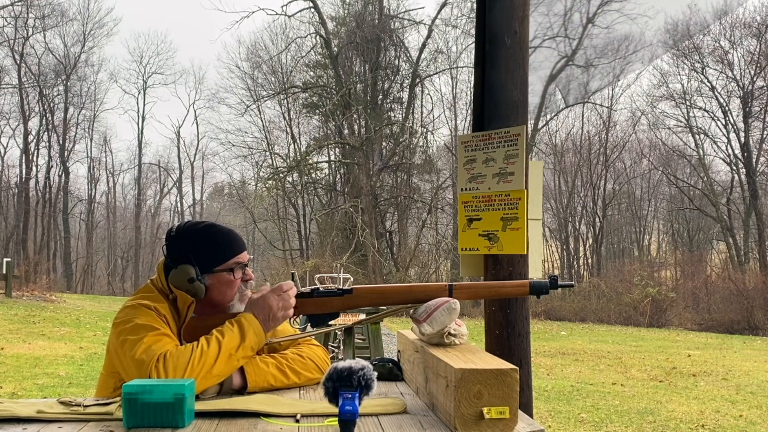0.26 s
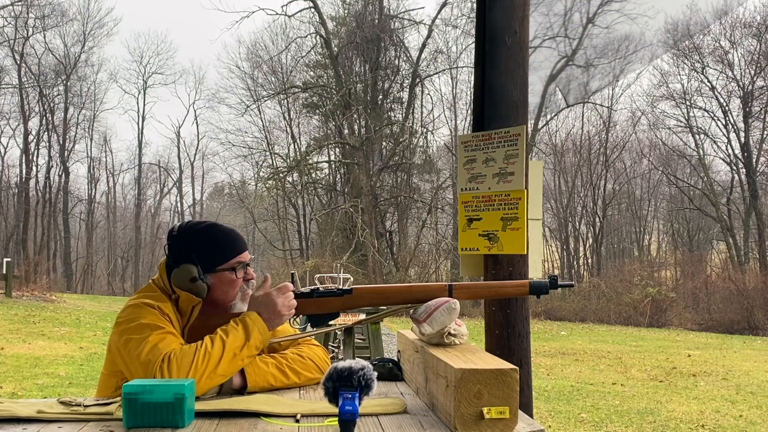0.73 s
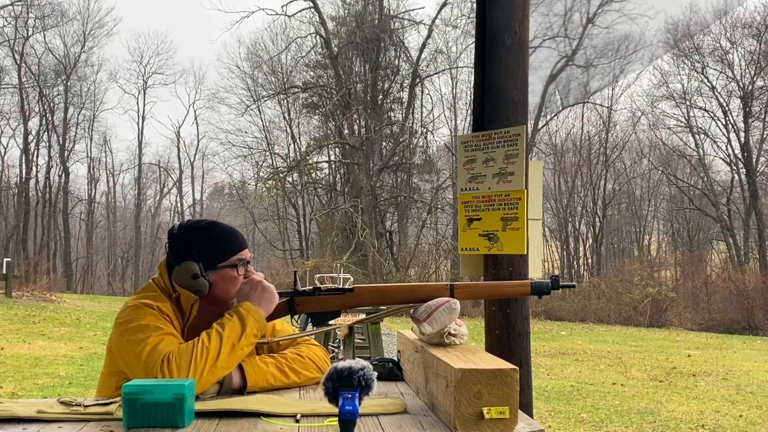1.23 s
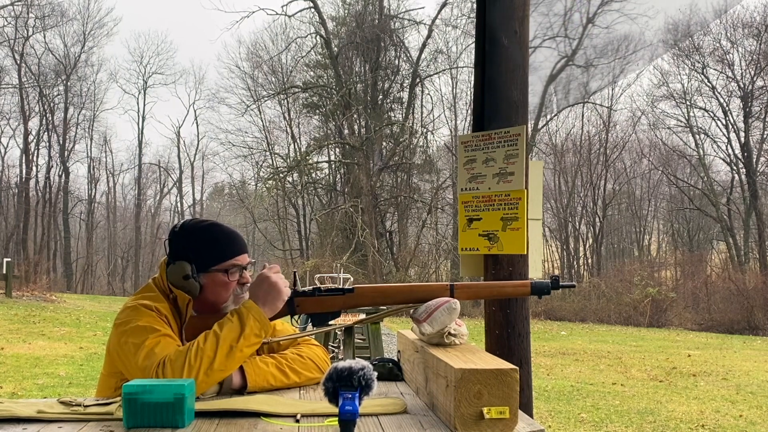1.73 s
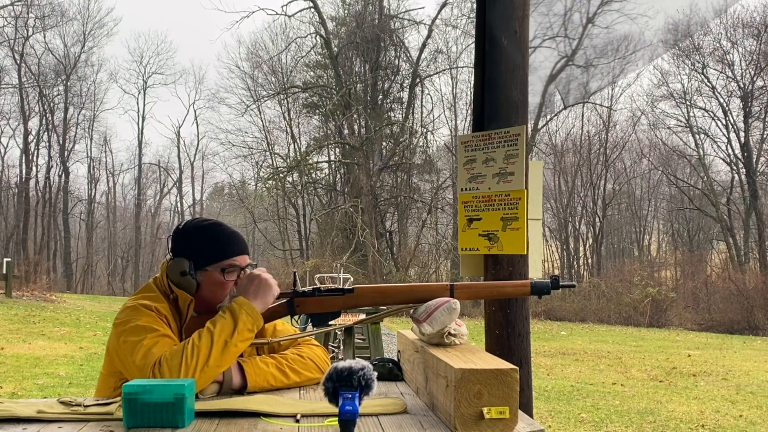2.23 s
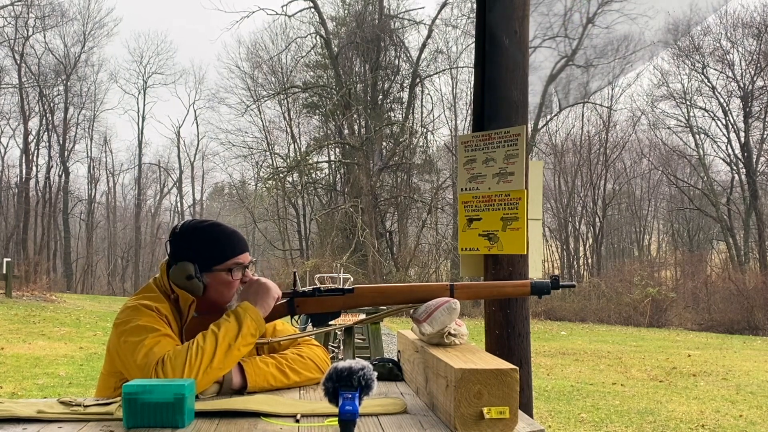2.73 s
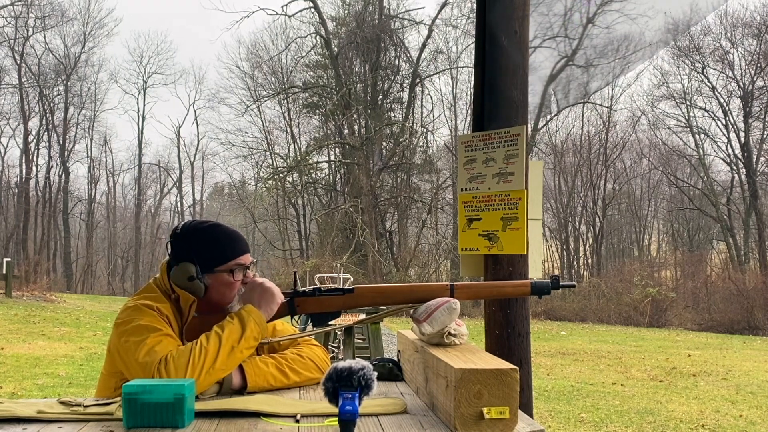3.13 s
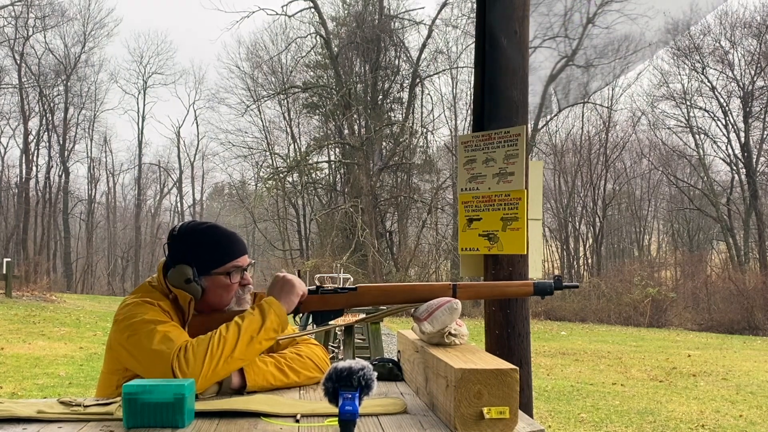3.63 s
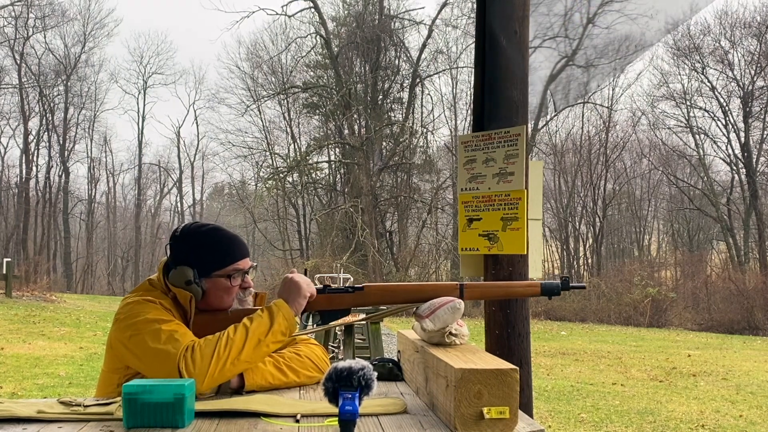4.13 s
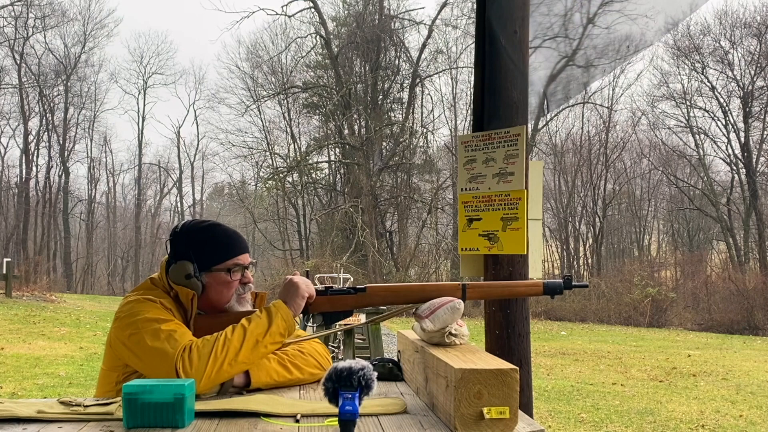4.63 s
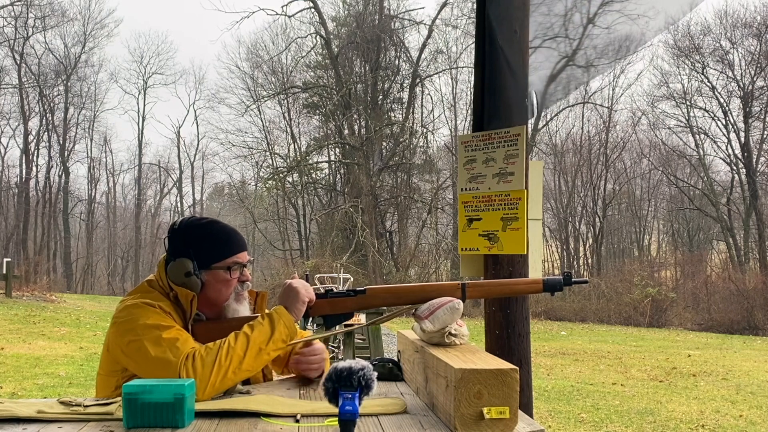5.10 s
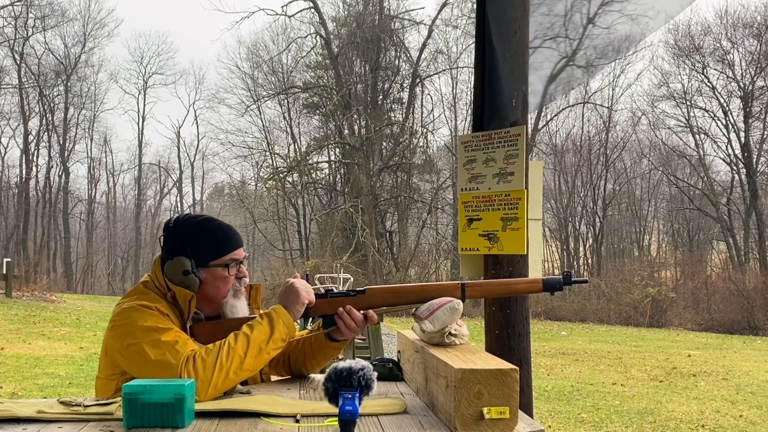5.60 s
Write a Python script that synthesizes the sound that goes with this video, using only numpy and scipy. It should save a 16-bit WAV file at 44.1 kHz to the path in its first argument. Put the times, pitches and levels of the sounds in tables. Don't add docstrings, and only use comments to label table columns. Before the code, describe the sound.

Sharp steel bolt clatter and a hollow knock of a spent case on a bench, then quiet rain, reloading clacks and sleeve rustle.

```python
import sys
import numpy as np
from scipy import signal
from scipy.fft import rfft, irfft, next_fast_len
from scipy.io import wavfile
from scipy.ndimage import uniform_filter1d, map_coordinates

SR = 44100
rng = np.random.default_rng(int(sys.argv[2]) if len(sys.argv) > 2 else 0)


def unload_audio(sound):
    columns = np.transpose(np.atleast_2d(sound))
    steps = np.round(np.clip(columns, -1, 1) * 32767)
    wavfile.write(sys.argv[1], SR, steps.astype(np.int16))


def boost(x):
    u = np.asarray(x, float) / 20
    return 10 ** u


N = 258426

# start_s, peak_db, board_boom_db, treble_db, hollow_knock_db
BOUNCES = [
    (1.3230, -16, -10.5, -45, -8),
    (1.335, -43, -8, -28.5, -12),
    (1.3456, 9, -15.5, -33, -12.5),
    (1.426, -23, -6, -36, -7),
    (1.452, -22, -22, -40, -9),
    (1.4685, 1, -12, -29, -16),
    (1.501, -7.5, -23, -35, -14),
]
# centre_hz, width_hz, level_db
STOCK_CLOSED = [(633, 65, 3), (970, 305, -5.5), (1500, 600, -10.5)]


def unit(x):
    return x / np.sqrt(np.mean(x ** 2) + 1e-20)


def along(points, hz):
    f, v = np.transpose(points)
    return np.interp(np.log(hz + 1), np.log(f + 1), v)


def curves(rows, outside=None):
    s, *cols = np.transpose(rows)
    return [np.interp(np.arange(N) / SR, s, c, outside, outside) for c in cols]


def wobble(rate):
    knots = rng.standard_normal(int(N * rate / SR) + 4)
    return map_coordinates(knots, [np.arange(N) * rate / SR]).clip(-2.3, 2.3)


def filtered(x, response):
    m = next_fast_len(x.shape[-1] + 4096)
    return irfft(rfft(x, m) * response(np.fft.rfftfreq(m, 1 / SR)), m)[..., :x.shape[-1]]


def resonances(peaks):
    def response(f):
        return sum((-1) ** k * boost(db) * 1j * f * width / (centre * centre - f * f + 1j * f * width)
                   for k, (centre, width, db) in enumerate(peaks))
    return response


def add(track, s, sound):
    part = track[..., round(s * SR):][..., :sound.shape[-1]]
    part += sound[..., :part.shape[-1]]


def ring(hz, t60, t, attack, lead=0):
    decay = boost(-60 * t / t60)
    return np.sin(2 * np.pi * hz * t + lead) * decay * (1 - np.exp(-t / attack))


def wide_ring(modes, t, attack):
    side = np.array([[.5], [-.5]])
    return sum((-1) ** k * boost(db + side * pan_db) * ring(hz, t60, t, attack, side * lead)
               for k, (hz, db, t60, pan_db, lead) in enumerate(modes))


def rush(spectrum, alike, patchy_db, pan_db, grit_db=0):
    rough = rng.standard_normal((2, N)) * boost(grit_db * wobble(400))
    z = signal.stft(rough, nperseg=512)[2]
    field = uniform_filter1d(rng.standard_normal(z.shape[1:]), size=6, axis=0)
    field = uniform_filter1d(field, size=10, axis=1)
    patches = boost(patchy_db * unit(field).clip(-2, 2))
    pair = signal.istft(z * patches, nperseg=512)[1][:, :N]
    turn = np.arccos(np.clip(alike, -1, 1)) / 2
    coloured = filtered(pair, lambda hz: boost(along(spectrum, hz)))
    mid, side = coloured * [[np.cos(turn)], [np.sin(turn)]]
    return unit(np.array([mid + side, mid - side])) * boost([[pan_db / 2], [-pan_db / 2]])


def rain():
    # pitch_hz, density_db
    far_spectrum = [(120, -45.5), (200, -3), (300, -6.5), (1000, -10), (2500, -15), (5000, -21),
                    (9000, -25), (14000, -50)]
    # pitch_hz, density_db
    fine_spectrum = [(1800, -24.5), (3500, -8.5), (6500, -19), (9000, -14), (12000, -13.5), (14000, -15),
                     (16000, -17.5)]
    far = rush(far_spectrum, alike=0.44, patchy_db=0.5, pan_db=2.0)
    fine = rush(fine_spectrum, alike=0.2, patchy_db=2.0, pan_db=2.0, grit_db=2.5)
    far_db = -53 + 5.5 + 0.18 * wobble(4.5)
    fine_db = -60.5 + 3.0 + 1.0 * wobble(27)
    return boost(far_db) * far + boost(fine_db) * fine


def wind():
    # start_s, level_db
    gusts = [(0.0, -52), (0.44, -36.5), (0.73, -50), (1.16, -41.5), (1.45, -61), (1.71, -44), (1.85, -51),
             (3.44, -52), (4.54, -55.5), (5.3, -49.5), (5.86, -49.5)]
    # pitch_hz, density_db
    buffet_spectrum = [(8.8, -39.5), (15, -0.5), (43, 4), (80, -0.5), (119, -5), (200, -21.5), (260, -37),
                       (440, -120)]
    gust_db, = curves(gusts)
    lumps = boost(1.6 * np.array([wobble(4), wobble(4)]))
    buffet = rush(buffet_spectrum, alike=-0.14, patchy_db=3.0, pan_db=4.5)
    return boost(gust_db + 4.5) * unit(lumps * buffet)


def drips():
    # start_s, peak_db
    heavy = [(0.2933, -32), (0.338, -38), (0.4677, -37), (0.5205, -33.5), (0.681, -34.5), (1.2003, -36),
             (1.64, -35.5), (1.7784, -33.5), (2.256, -36.5), (2.342, -35.5), (2.462, -31.5), (2.474, -34),
             (2.714, -34), (2.736, -34.5), (2.821, -31.5), (2.9, -37), (2.9225, -37.5), (3.007, -32),
             (3.391, -32), (3.9063, -36.5), (4.2088, -36), (4.3030, -36), (4.346, -40), (4.461, -31),
             (5.6186, -35), (5.6525, -37), (5.745, -35), (5.783, -35.5), (5.825, -37)]
    light = [0.0084, 0.0558, 0.0987, 0.6155, 0.6594, 1.3032, 1.8327, 1.9046, 1.9594, 1.9959, 2.424, 2.521,
             2.537, 2.5784, 2.6896, 2.77, 3.1394, 3.1995, 3.2516, 3.8055, 4.022, 4.037, 4.186, 4.2434,
             4.259, 4.4187, 5.573, 5.709]
    # pitch_hz, density_db
    splash_spectrum = [(1500, -28), (3500, -2), (6000, -3), (10000, -1.5), (14000, -10), (17000, -7.5)]
    light_db, drop_hz, spread = -41, 6950, 0.15
    out, t = np.zeros((2, N)), np.arange(SR // 12) / SR
    for s, db in heavy + [(s, light_db) for s in light]:
        noise = rng.standard_normal((4, len(t)))
        u = t / (.012 * boost(2.5 * noise[0, 0]))
        hz = drop_hz * np.exp(spread * noise[1, 0])
        grains = boost(4.8 * unit(uniform_filter1d(noise[3], size=40))) * u * np.exp(1 - u * u)
        colour = resonances([(hz, 900, 0)])
        spray = filtered((noise[0] + 1.6 * noise[1:3]) * grains,
                         lambda f: boost(along(splash_spectrum, f)) + boost(2.0) * colour(f))
        add(out, s - .004, boost(db + 3.5) * spray / abs(spray).max())
    return out * boost([[3], [-3]])


def effort():
    # start_s, level_db
    strokes = [
        [(.08, -68.5), (.16, -49.5), (.24, -49.5), (.36, -53)],
        [(4.5, -58.5), (4.58, -46), (4.66, -43), (4.74, -46.5), (4.94, -45), (5.04, -44.5), (5.09, -49)],
        [(5.09, -47), (5.11, -46), (5.2, -47.5), (5.33, -45), (5.38, -43), (5.43, -40.5), (5.49, -42.5),
         (5.53, -46.5), (5.62, -69.5)],
    ]
    return np.max([curves(rows, -120)[0] for rows in strokes], axis=0)


def sleeve():
    # pitch_hz, density_db
    hiss_spectrum = [(1500, -1.5), (2400, 0.5), (4050, -1.5), (5220, 3), (6760, 1), (10300, 0), (14500, -9),
                     (16000, -15.5)]
    # pitch_hz, density_db
    scrape_spectrum = [(150, -11), (250, -13), (620, -3.5), (1500, -6), (2500, -5), (4200, -12),
                       (6800, -21), (11000, -22.5)]
    even_db, growth = -45, 2.2
    echo_s, echo_share, echo_from_s = .0004, 0.28, 5.39
    drag_db = effort()
    hiss_db = even_db + growth * (drag_db - even_db)
    hiss = boost(hiss_db) * rush(hiss_spectrum, alike=0.62, patchy_db=2.0, pan_db=0.7, grit_db=2.5)
    scrape = boost(drag_db) * rush(scrape_spectrum, alike=0.88, patchy_db=1.9, pan_db=1.0, grit_db=1.0)
    cloth = hiss + scrape
    low = np.arange(N) / SR > echo_from_s
    return cloth + echo_share * np.roll(cloth * low, round(echo_s * SR), axis=1)


def bench_hum(duck):
    # centre_hz, width_hz, level_db
    stand = [(150.6, 36, 0)]
    rest_db, over_drag_db, under_case_db, hum_t60_s = -52, -2.5, -22.5, 0.17
    bench = resonances([(122.4, 43.0, 3.5), (197.5, 25.0, 1.5), (244, 36, -2.0), (350, 140, -12)])
    drive = rush([(50, 0)], alike=0.03, patchy_db=3, pan_db=4.5) * boost(0.5 * wobble(4.9))
    hum = unit(filtered(drive, bench))
    shake, t = duck * boost(rest_db) + boost(effort() + over_drag_db), np.arange(SR // 2) / SR
    for s, db, *_ in BOUNCES:
        add(shake, s, boost(db + under_case_db - 60 * t / hum_t60_s))
    rock = filtered(rng.standard_normal(N), resonances(stand))
    rock = unit(filtered(rock, resonances(stand)))
    return boost(4.5) * shake * hum + boost(-4.5 + 3.0) * shake * rock * [[1], [-1]]


def sway():
    # start_s, level_db
    lean = [
        (2.9, -64),
        (3.05, -49.5),
        (5.86, -45),
    ]
    slow = unit(filtered(rng.standard_normal(N), resonances([(37.45, 4.4, 0)])))
    return boost(curves(lean)[0]) * slow * [[1], [-1]]


def thuds():
    # start_s, peak_db, knock_db
    pushes = [(0.401, -27, -29), (0.574, -33, 11), (0.844, -31.5, 3.5), (0.975, -28, -27),
              (1.082, -21, -6.5), (1.167, -24, -75), (3.002, -29, -4), (3.448, -33, -27),
              (3.585, -24.5, -4.5), (3.834, -17.5, -6), (4.176, -21.5, -9.5), (4.571, -30, -16),
              (4.667, -20, -2.5), (5.05, -39, -2), (5.158, -30, 1.5), (5.291, -36, -6.5), (5.395, -37, 2),
              (5.676, -38.5, 1)]
    # pitch_hz, level_db, t60_s, left_right_db, left_lead_rad
    frame = [(115.8, 2.5, 0.42, -9, 2.07), (133.3, 6, 0.27, -2.5, 2.54), (197.4, -2.5, 0.11, 12, 1.8),
             (156, 2.5, .15, -1.5, 2.98)]
    out, t = np.zeros((2, N)), np.arange(SR // 2) / SR
    falling_hz = 230 + 500 * np.exp(-t / 0.00402)
    knock = np.sin(2 * np.pi * np.cumsum(falling_hz) / SR) * boost(-60 * t / 0.23)
    swell = boost(-7.0) * wide_ring(frame, t, attack=0.0018)
    for s, db, knock_db in pushes:
        add(out, s, boost(db) * (swell + boost(knock_db - 9.5) * knock))
    return out


def receiver():
    # centre_hz, width_hz, level_db
    steel_modes = [(2100, 165, -0.5), (2845, 136, 6.5), (3370, 140, 5.5), (4326, 210, 8.5),
                   (6200, 220, -4.5), (6790, 270, -8.5), (7300, 350, -8), (8750, 280, -8),
                   (8050, 150, -29.5), (10070, 180, -20.5), (10100, 33, -10), (11180, 58, -32.5)]
    return resonances([(hz, 4 * width, db) for hz, width, db in steel_modes] + [(3780, 4300, -6.0)])


def bright(f):
    return (f / 6500) ** 3 / (1 + (f / 6500) ** 3) / (1 + (f / 10500) ** 5)


def bolt_contacts():
    # start_s, peak_db, ring_hz, treble_db, stock_knock_db
    opening = [(0.5740, -15.5, 3330, -24.5, -7), (0.8438, -23, 3200, -12, -15),
               (0.8495, -25.5, 3260, -13, -14), (0.8522, -5.5, 3310, -2, -18),
               (0.8573, -6.5, 6400, -0.5, -25), (0.8618, -0.5, 4190, -2.5, -20),
               (0.8660, -17, 2720, -1, -27), (0.9990, -28, 4850, -6.5, -20), (1.0204, -14.5, 3510, 1, -18),
               (1.0289, -7, 3420, -5, -22.5), (1.0343, -5, 3260, -12, -37), (1.0425, -17, 3430, -8.5, -26),
               (1.0608, -0.5, 3270, -10.5, -38), (1.0650, -9, 3330, -20, -26),
               (1.0732, 1.5, 2695, -4.5, -16), (1.0752, -2.5, 3600, -7, -11),
               (1.0790, -15, 2680, -12.5, -15.5), (1.0850, -13, 3620, -10, -30),
               (1.0941, -1.5, 3230, -20, -43.5)]
    # start_s, peak_db, ring_hz, treble_db, stock_knock_db
    closing = [(3.3094, -18, 4240, -20, -9), (3.3160, -16, 2632, -23, -7), (3.3637, -14, 3050, -8, -9),
               (3.3670, -14.5, 2560, -12, -5), (3.4116, -14, 3980, -18, -5),
               (3.4140, -10.5, 3300, -14, -6.5), (3.472, -32.5, 3240, -8, 0.5),
               (3.5050, -38, 4800, 3, -26.5), (3.5244, -28, 2440, -6, 5.5), (3.5335, -2, 3200, -7, -12.5),
               (3.5360, 1.5, 3520, -9, -14.5), (3.5422, -2.5, 3400, -12, -14.5),
               (3.5510, -16, 3300, -7, -7), (3.5642, 0, 4140, -8.5, -25), (3.5670, -6, 2230, -4.5, -15.5),
               (3.5770, -18, 2300, -12, -18), (3.5818, -20, 3400, -10, -16), (3.5934, -14, 2150, -13, -23),
               (3.6000, -20, 4000, -6, -15), (3.6180, -20, 2050, -14, -21), (3.6228, -14, 3550, -6, -19.5),
               (3.6320, -31.5, 2200, -15, -19.5), (3.6622, -20.5, 2090, -18.5, 0),
               (3.6668, -3, 3576, -12, -27), (3.6904, -5, 5320, -8, -30), (3.7014, -20, 5140, -14, -36.5)]
    # start_s, peak_db, ring_hz, treble_db, stock_knock_db
    settling = [
        (4.7262, -9, 3330, -12, -12),
        (5.0492, -34, 5650, 3, -22),
        (5.3776, -29, 1400, -14, -1),
        (5.3966, -33, 2200, -6, 2),
        (5.4292, -35, 2600, 2, -20),
    ]
    # pitch_hz, level_db, t60_s
    lines_open = [(2719, -33, .12), (3483, -30, .07), (4199, -31, .11), (4732, -30, .07), (5460, -34, .09),
                  (6148, -36, .16), (6363, -38, .15), (7009, -33, .08), (9620, -25, .055)]
    # pitch_hz, level_db, t60_s
    lines_home = [(2052, -6, .06), (2536, -4, .08), (3350, -2, .06), (3490, -2, .06), (4400, -10, .1),
                  (5320, -6, .07)]
    # centre_hz, width_hz, level_db
    stock_open = [(850, 200, 1), (1380, 256, -0.5), (1910, 91, -27.5)]
    first_touch = 3.05
    out, t = np.zeros(N), np.arange(SR // 6) / SR
    fast = boost(-60 * t / 0.016)
    slow = boost(-12 - 60 * t / 0.035) * (1 - np.exp(-t / 0.00082))
    chatter = fast + slow
    steel = receiver()
    for rows, ring_db in [(opening, -6), (closing, -9.5), (settling, -11)]:
        for s, db, hz, treble_db, knock_db in rows:
            noise = rng.standard_normal((3, len(t)))
            noise[:2, 1] = first_touch
            if s < 2:
                modes, lines_db = lines_open, -14 * (s > .9)
            else:
                modes, lines_db = lines_home, -35
            lines = sum(boost(level + lines_db + 3 * noise[2, -1 - k]) * ring(f, t60, t, attack=.001)
                        for k, (f, level, t60) in enumerate(modes))
            stock = resonances(stock_open if s < 2 or 4 < s < 5 else STOCK_CLOSED)
            parts = [filtered(noise[k] * chatter, shape) for k, shape in enumerate([steel, bright, stock])]
            parts.append(ring(hz, 0.02, t, attack=0.0006))
            levels = boost(db + np.array([-3.5, treble_db + 4.5, knock_db + 4.5, ring_db]))
            add(out, s, boost(db) * lines + sum(g * part / abs(part).max() for g, part in zip(levels, parts)))
    return out


def handle_lift():
    # start_s, peak_db, pitch_hz
    lifts = [
        (0.8433, -11.5, 3310),
        (.8490, -13.5, 3285),
    ]
    out, t = np.zeros(N), np.arange(SR // 6) / SR
    for s, db, hz in lifts:
        add(out, s, boost(db + 6.5) * ring(hz, .025, t, attack=.003))
    return out


def bolt_slide():
    # start_s, length_s, level_db
    slides = [
        (0.849, 0.016, -31.5),
        (0.996, .014, -33.5),
        (1.024, 0.019, -27.5),
        (3.313, 0.011, -34),
        (3.403, .004, -37.5),
        (3.535, 0.058, -24),
        (3.615, 0.016, -31),
    ]
    rise_s, fall_s, edge_db = .016, 0.021, 16.5
    steel, stock = receiver(), resonances(STOCK_CLOSED)
    rough = rng.standard_normal(N) * boost(4 * wobble(400))
    grit = unit(filtered(rough, lambda f: steel(f) + boost(-0.5) * bright(f) + boost(8) * stock(f)))
    gain = np.zeros(N)
    for s, length, db in slides:
        end = s + length
        stroke = [(s - rise_s, db - edge_db), (s, db), (end, db), (end + fall_s, db - edge_db)]
        gain += boost(curves(stroke, -120)[0])
    return grit * gain


def case():
    # start_s, level_db
    blows = [
        (1.02, -28),
        (1.033, -28),
        (1.061, -25),
        (1.092, -19.5),
        (1.346, -48.5),
        (1.469, -32),
    ]
    # pitch_hz, level_db, t60_s
    brass = [(3262, -10, .16), (3354, -13, .12), (8372, -5, .17), (8402, -8, .17), (11085, -2, .15),
             (11510, -10, .2)]
    out, t = np.zeros(N), np.arange(SR // 3) / SR
    for s, db in blows:
        add(out, s, sum(boost(db + level) * ring(hz, t60, t, attack=.0006) for hz, level, t60 in brass))
    return out


def bounces():
    # start_s, peak_db, board_boom_db, treble_db, hollow_knock_db
    nudges = [
        (4.3005, -33, -26, -22, -25),
        (4.3095, -26, -30, -28, -31),
    ]
    # centre_hz, width_hz, level_db
    plank_modes = [(955, 25, -12), (1193, 60, -4.5), (1363, 55, 6.5), (1529, 35, -5), (1767, 69, -6),
                   (1921, 78, 4.5), (2084, 70, 0), (2285, 80, -3), (2550, 68, -2.5), (3060, 280, -7.5),
                   (3550, 200, -16.5), (4050, 270, -14.5), (4500, 300, -16.5)]
    # centre_hz, width_hz, level_db
    hollow_modes = [(560, 59, -6), (640, 53, 4), (714, 256, 1), (798, 89, -1.5)]
    # pitch_hz, level_db, t60_s, left_right_db, left_lead_rad
    board_modes = [(217.8, -3, 0.25, 10.5, 1.3), (295, -11, 0.11, 16, 0.97), (188, -14.5, 0.15, -4, 0.7),
                   (147, -3, 0.28, 3, 3.0)]
    near, board, t = np.zeros(N), np.zeros((2, N)), np.arange(SR // 2) / SR
    sharp = resonances(plank_modes)

    def plank_response(f):
        dense = boost(-15.5) * 1j * f * 3000 / (1700 ** 2 - f * f + 1j * f * 3000) / (1 + 1j * f / 3500) ** 2
        return sharp(f) + dense

    rattle = boost(-45) * ring(1480, .45, t, attack=.02)
    boom = wide_ring(board_modes, t, attack=0.0041)
    for s, db, boom_db, treble_db, hollow_db in BOUNCES + nudges:
        noise = rng.standard_normal((3, len(t)))
        blow = noise * (boost(-3 - 60 * t / 0.0041) + boost(-14.5 - 60 * t / 0.065))
        blow[:2, 0] = 6
        plank = filtered(blow[0], plank_response)
        hollow = filtered(blow[1], resonances(hollow_modes))
        crack = filtered(blow[2], resonances([(5500, 5000, 0.0047)]))
        knock = boost(-5.5) * plank / abs(plank).max() + rattle
        knock += boost(hollow_db + 5.0) * hollow / abs(hollow).max()
        knock += boost(treble_db + 1) * crack
        add(near, s, boost(db) * knock)
        add(board, s, boost(db + boom_db + 0.5) * boom)
    add(near, 1.3235, boost(-1) * ring(770, 0.015, t, attack=0.002))
    return near, board


def roof(x):
    # pitch_hz, t60_s
    decay = [(200, 0.16), (2000, 0.13), (5000, .12), (12000, 0.11)]
    out, hop = np.zeros((2, N)), 2048
    for start in range(0, N, hop):
        block = x[start:start + hop]
        if abs(block).max() > 2e-3:
            hz, t, z = signal.stft(rng.standard_normal((2, SR // 4)), SR, nperseg=128)
            tail = signal.istft(z * boost(-60 * t / along(decay, hz)[:, None]), SR, nperseg=128)[1]
            tail = 0.6 * tail[0] + tail * [[.8], [.9]]
            tail /= np.linalg.norm(tail[0])
            add(out, start / SR + 0.001204, signal.fftconvolve(block[None], tail, axes=1))
    return out


def ports(x, lag, pan_db, scatter):
    # pitch_hz, phase_rad
    phase_scatter = [(300, 0.14), (1300, 0.62), (3000, 0.11), (5000, 0.2), (8000, 0.22), (11000, .6),
                     (14000, 1.1)]
    side = np.array([[1], [-1]])
    housing = rng.standard_normal(64)

    def shift(f):
        return np.pi * f * lag + scatter * along(phase_scatter, f) * map_coordinates(housing, [f / 400])

    return filtered(x, lambda f: np.exp(-1j * side * shift(f))) * boost(side * pan_db / 2)


def handheld(rifle):
    grip_s = [
        .95,
        1.05,
        2,
        3.5,
        3.64,
        4,
    ]
    grip = np.searchsorted(grip_s, np.arange(N) / SR)
    return sum(ports(rifle * (grip == k), lag=.000015, pan_db=1.1, scatter=1.3)
               for k in range(len(grip_s) + 1))


def ducking(x):
    from_db, share, recover_db_per_s = -21, 0.98, 15
    level_db = 10 * np.log10(abs(uniform_filter1d(x ** 2, size=1024)) + 1e-12)
    climb_db = recover_db_per_s * np.arange(N) / SR
    cut_db = share * np.maximum(level_db - from_db, 0)
    return boost(climb_db - np.maximum.accumulate(cut_db + climb_db))


def gated_treble(x, quiet_db, depth_db):
    hz, _, z = signal.stft(x, SR, nperseg=1024)
    power = abs(uniform_filter1d((abs(z) ** 2).mean(0), size=17, axis=0))
    level_db = 10 * np.log10(power + 1e-14)[8::16].repeat(16, axis=0)
    high = hz[:512, None]
    loudest_db = np.where(high > 2000, level_db, -200).max(0)
    usual_db = np.median(level_db[96:240], axis=0) + 1.5 * rng.standard_normal(level_db.shape[1])
    audible = level_db > loudest_db - depth_db
    clear = (high < 12000) | (level_db > usual_db - quiet_db)
    z[:, :512] *= (high < 8500) | (audible & clear)
    return signal.istft(z, SR, nperseg=1024)[1][:, :N]


def scene():
    rifle = bolt_contacts() + handle_lift() + bolt_slide() + case()
    plank, board = bounces()
    close = handheld(rifle) + ports(plank, lag=.00005, pan_db=0.0, scatter=0.82)
    duck = ducking(rifle + plank)
    wet = duck * rain() + duck ** 0.58 * drips() + wind()
    bench = bench_hum(duck) + sway() + board + thuds()
    return close + boost(-11.5) * roof(rifle + plank) + bench + wet + sleeve()


def low_pass(x):
    return signal.sosfilt(signal.butter(12, 16190, fs=SR, output="sos"), x)


def record(dry):
    rolled_off = filtered(dry, lambda f: 1 / (1 + (f / 16200) ** 8))
    heard = gated_treble(rolled_off, quiet_db=13.0, depth_db=34.5)
    limited = heard / (1 + abs(heard) ** 8) ** (1 / 8)
    return low_pass(limited)


dry = scene()
out = record(dry)
unload_audio(out)
```